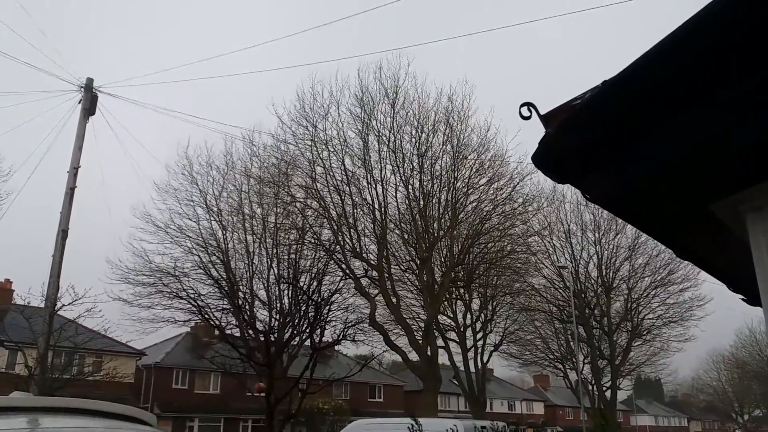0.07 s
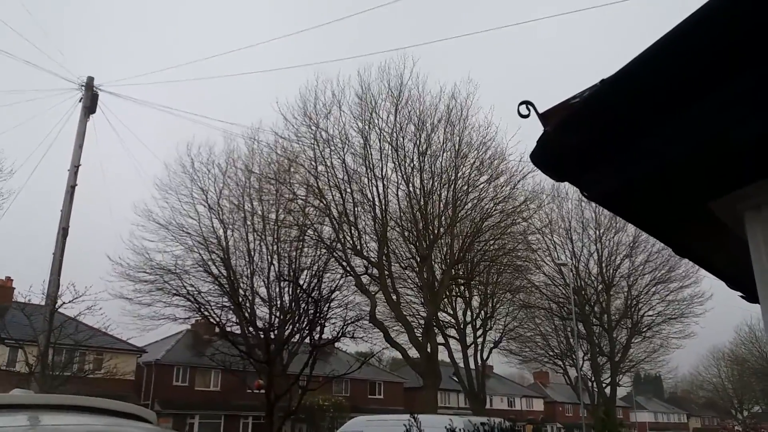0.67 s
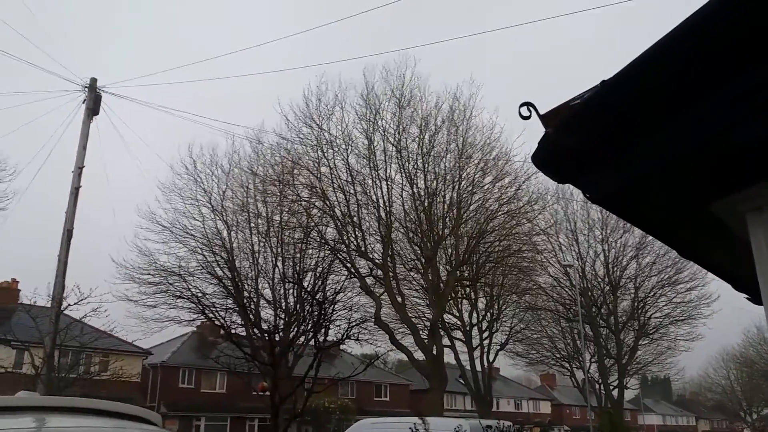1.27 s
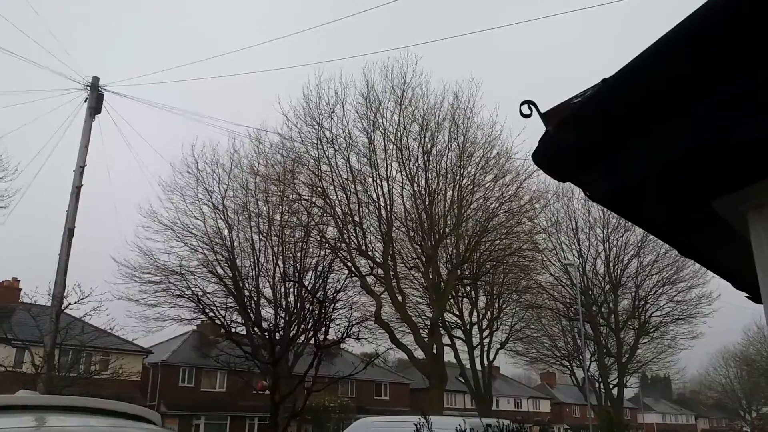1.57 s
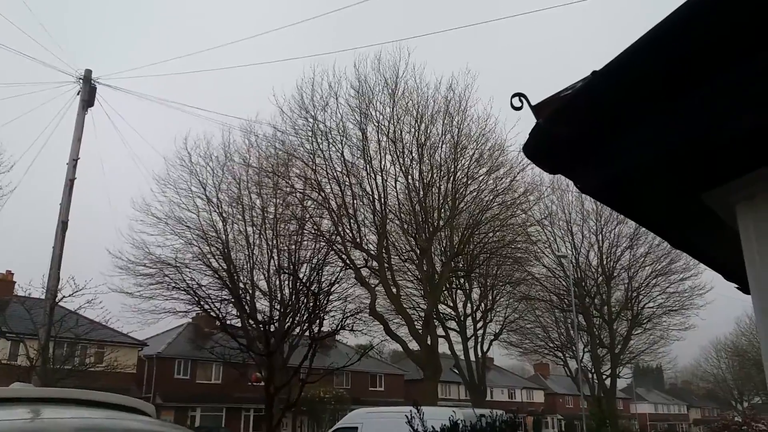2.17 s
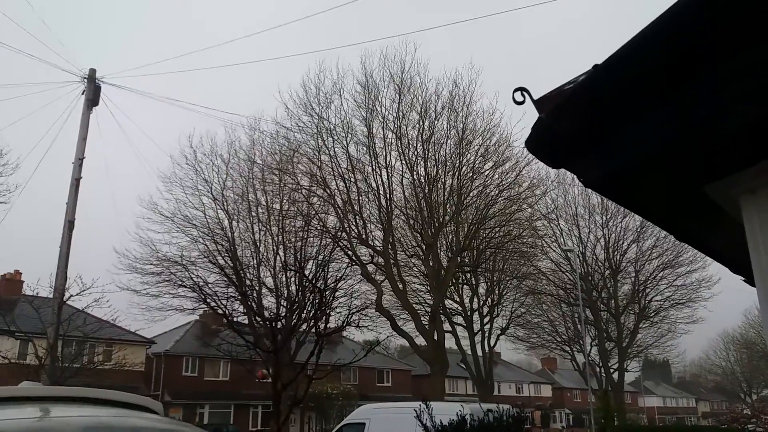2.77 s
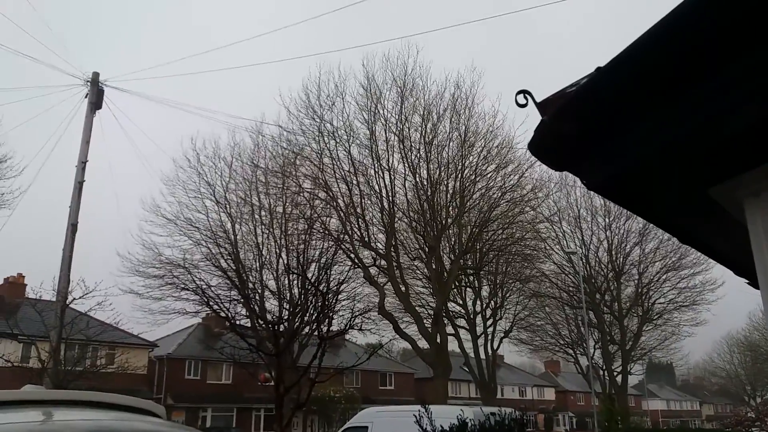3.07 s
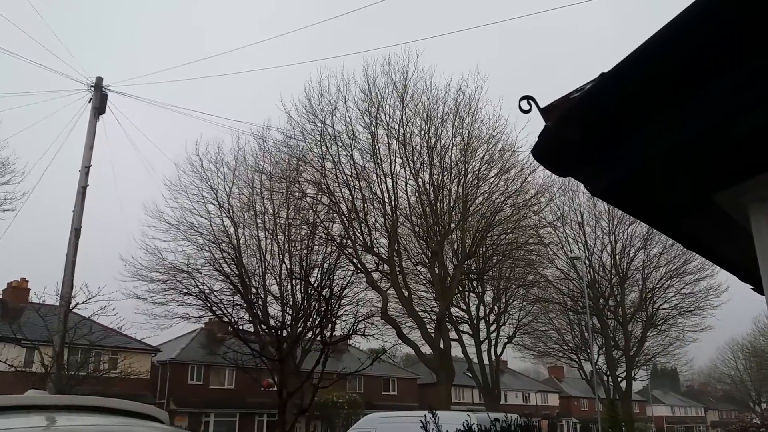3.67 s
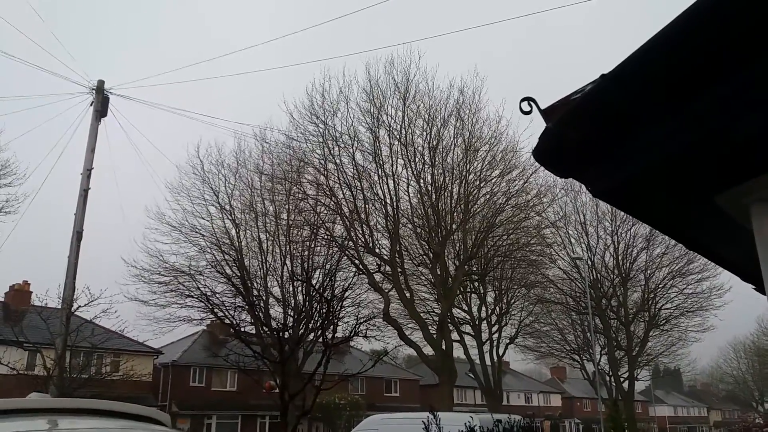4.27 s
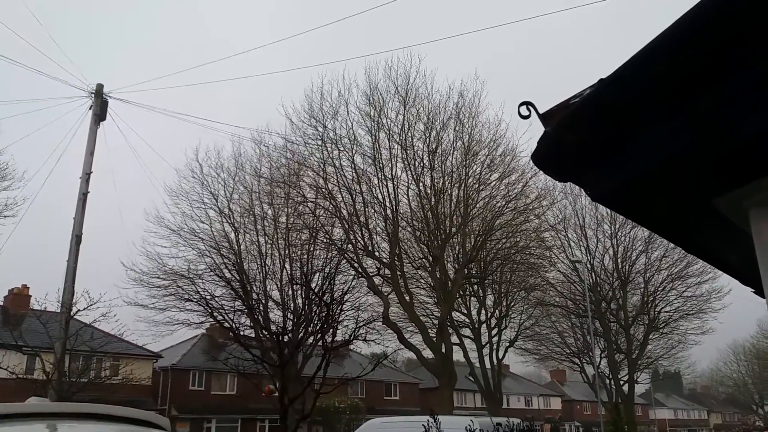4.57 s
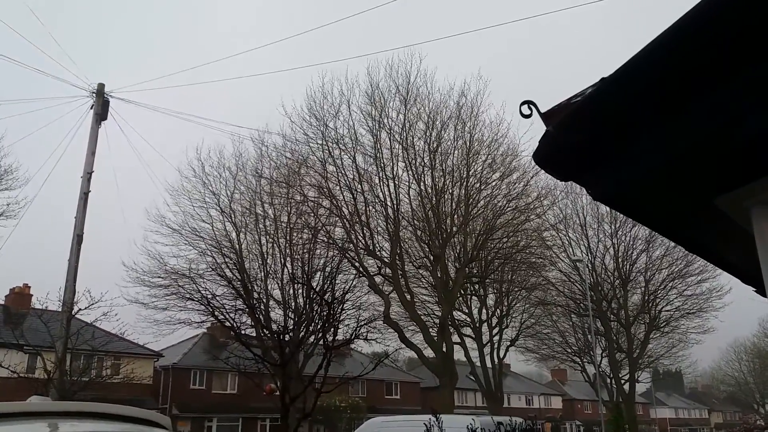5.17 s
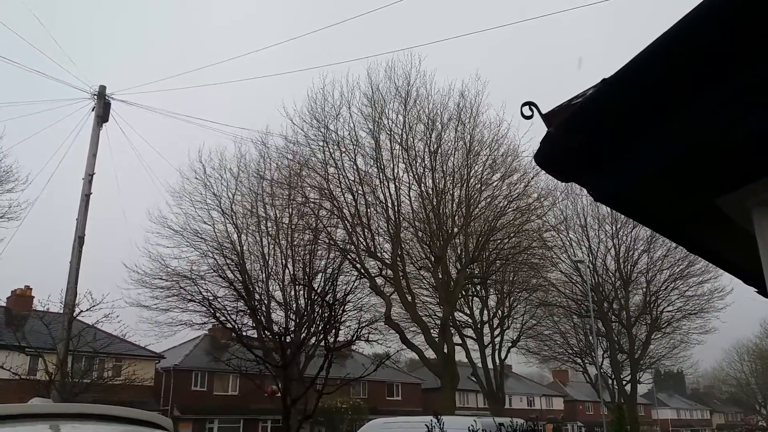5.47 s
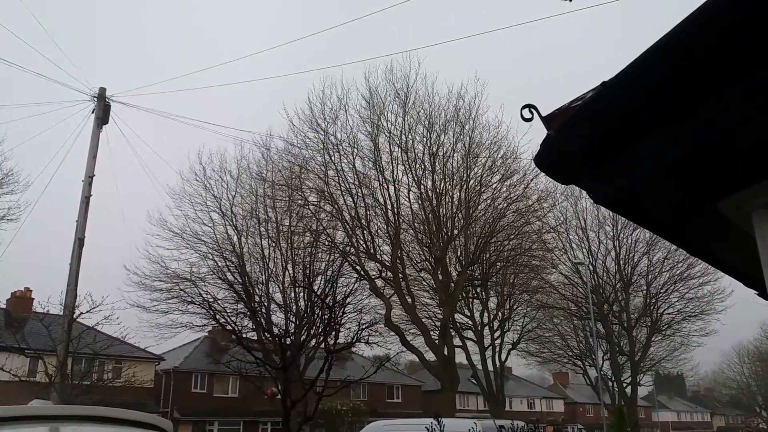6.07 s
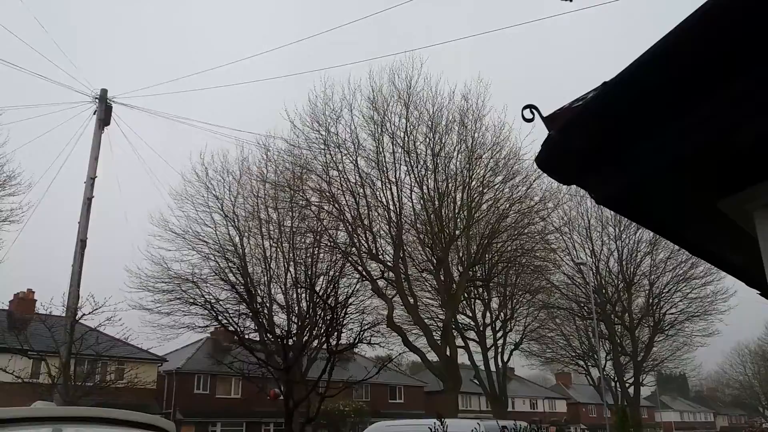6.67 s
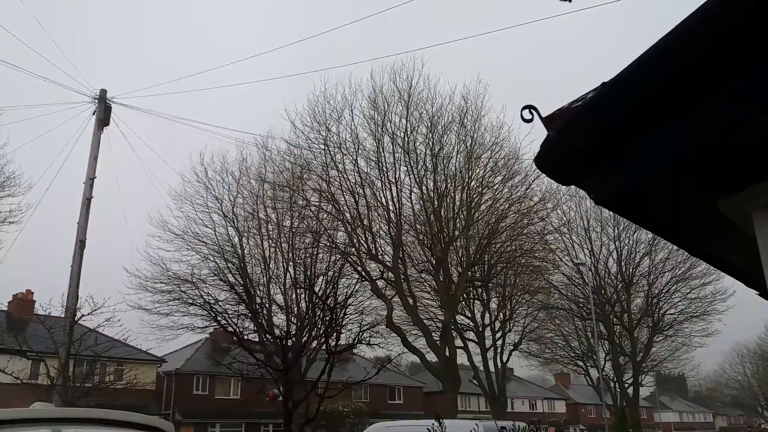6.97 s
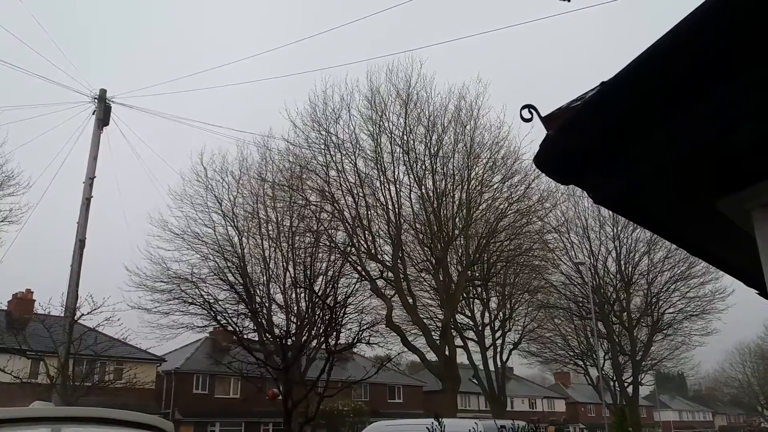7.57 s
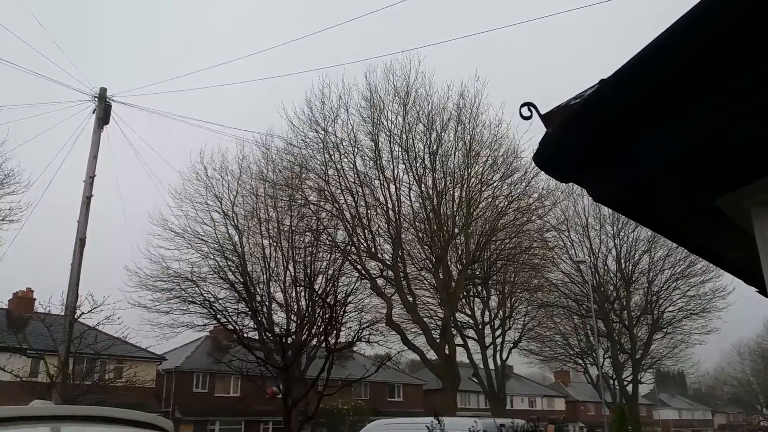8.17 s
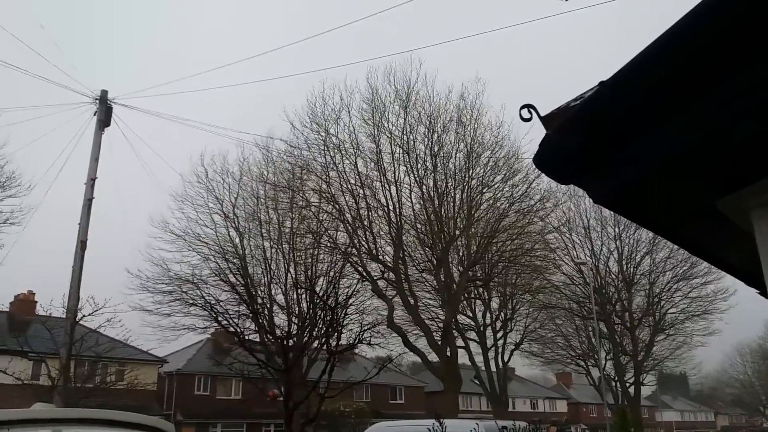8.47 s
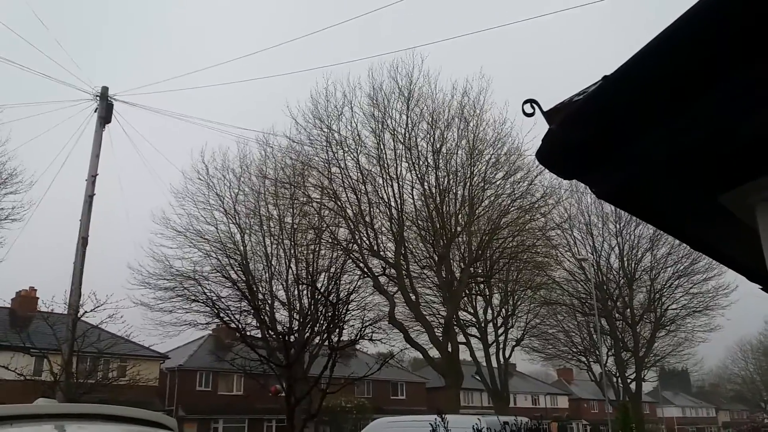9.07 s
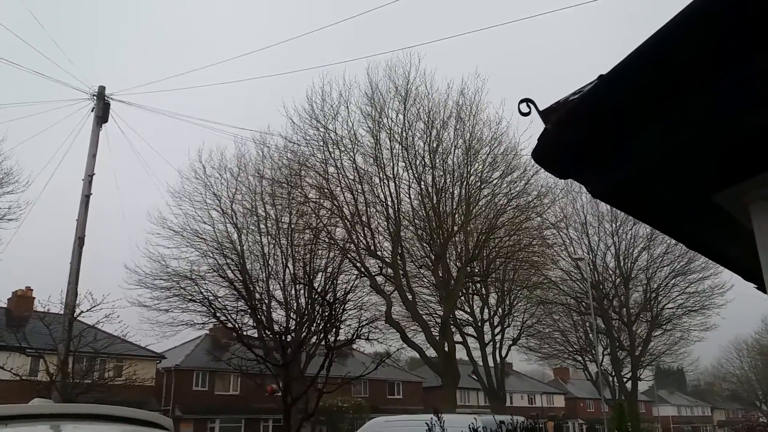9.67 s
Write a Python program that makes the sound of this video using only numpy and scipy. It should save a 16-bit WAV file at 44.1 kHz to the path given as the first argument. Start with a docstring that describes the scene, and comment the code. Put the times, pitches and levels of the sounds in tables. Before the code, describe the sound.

Steady rain falls on a street of houses, heard from under a porch roof. Throughout the ten seconds, drops patter on roofs and cars and hiss finely on wet paving. Single drips tap and splash close by at irregular moments, thickest between 1 and 3 seconds. From the start, gusts hit the microphone with low, ragged thumps, the loudest sounds here, hardest around 0.5 seconds and from 1 to 2.3 seconds. Behind them, wind rushes softly through distant bare trees, peaking near 1.6 seconds. Around 3 seconds the rain eases and the gusts weaken, with one sharp thump at 3.3 seconds and smaller ones near 3.8 and 5 seconds. The last gust passes at about 6 to 6.4 seconds. A faint rumble of breeze stays to the end, while the rain swells briefly near 5.8, 7.8 and 9.7 seconds.

```python
"""Steady rain on a street of houses, heard from under a porch roof.
From the start, drops patter on roofs and cars and hiss on wet paving, and drips splash close by.
For the first few seconds, gusts thump the microphone hard and rush in the bare trees.
Around three seconds in, the rain eases and the gusts weaken; the last one passes at about six.
A soft rumble of breeze stays to the end, while the rain swells briefly a few more times."""
import sys
import numpy as np
from scipy import signal
from scipy.fft import rfft, irfft, next_fast_len
from scipy.io import wavfile
from scipy.ndimage import uniform_filter1d, minimum_filter1d, map_coordinates

SR = 44100
rng = np.random.default_rng(int(sys.argv[2]) if len(sys.argv) > 2 else 0)


def transcribe(u):
    """Save the signal u as a 16-bit wav file named by the first command-line argument.

    u: samples, shape (n,) or (channels, n), limited to [-1, 1]; the rate is SR.
    q: integer samples, one column per channel.
    """
    v = np.clip(np.atleast_2d(u).T, -1, 1)
    q = np.round(v * 32767).astype(np.int16)
    wavfile.write(sys.argv[1], SR, q)


N = 437913

# How hard it rains. Each row: time in seconds, relative patter level in dB, relative hiss level in dB.
RAIN_LEVELS = [(0.0, -34.5, -36), (0.47, -40, -37), (0.85, -36.5, -37), (1.22, -39, -39),
               (1.52, -36.5, -39), (1.66, -34.5, -36.5), (1.93, -37.5, -36), (2.29, -36, -38),
               (2.74, -40, -41), (3.32, -41.5, -43), (5.14, -40.5, -41.5), (5.53, -37, -39.5),
               (5.78, -35, -37.5), (6.41, -40, -41.5), (7.47, -39.5, -41.5), (7.8, -36, -38.5),
               (8.19, -40, -41), (8.68, -37, -40.5), (8.99, -40, -40.5), (9.35, -38, -40.5),
               (9.68, -37.5, -37.5), (9.93, -38.5, -39)]
# The nearest drips. Each row: start in seconds, relative level in dB, wetness from 0 (dry) to 1.
NEAR_DRIPS = [(0.71, -30, .35), (1.163, -27, .75), (1.245, -30.5, .3), (1.275, -29.5, 0.53),
              (1.305, -30.5, 0.44), (1.455, -33, 0.97), (1.497, -34.5, 0.84), (1.754, -31, 0.83),
              (1.781, -31, .5), (1.9, -32, 0.82), (1.964, -31.5, 0.92), (2.086, -30.5, 0.99),
              (2.138, -37, 0.98), (2.18, -28, 0.54), (2.355, -36, .05), (2.386, -35, 0),
              (2.415, -31.5, 0.21), (2.586, -39, 0.99), (2.717, -38, 1), (2.868, -31, 0.78),
              (2.979, -34, 0.61), (3.012, -34, 0.54), (3.628, -40, 0.37), (3.89, -34, 0.44),
              (4.038, -35.5, 0.7), (4.229, -39.5, 0.14), (4.643, -33.5, 0.5), (4.85, -42, .95),
              (5.224, -33.5, 0), (5.293, -33, 0), (5.315, -33, 0.03), (5.421, -31.5, 0.22),
              (5.608, -33, .05), (5.669, -29.5, 0.44), (5.867, -30, 0.46), (5.897, -34, 0.83),
              (6.144, -36, 1), (6.227, -35, 0.38), (6.744, -37, .55), (6.797, -30.5, .35),
              (6.848, -38, 0.02), (7.245, -39, .85), (7.486, -30.5, 0.68), (7.624, -38.5, 0),
              (7.705, -35, .95), (8.481, -34.5, 0.22), (8.507, -37, 0.1), (8.885, -35, 0.48),
              (9.003, -36, 1), (9.071, -41, 0.98), (9.608, -33.5, 0.67)]
# Gusts that reach the porch. Each row: start in seconds, end in seconds, relative level in dB.
PORCH_GUSTS = [(0.078, 0.698, -25), (1.021, 1.6, -20.5), (1.69, 2.12, -20.5), (2.202, 2.641, -27.5),
               (3.071, 3.217, -29), (3.477, 3.871, -32.5), (5.48, 5.811, -32.5), (5.988, 6.428, -32.5)]
# The hardest eddies, small spins of air that each make one thump.
# Each row: peak time in seconds, relative level in dB, fade time in seconds, rough pitch in Hz.
EDDY_THUMPS = [(0.145, -14, 0.041, 189.5), (0.25, -18, .045, 200), (0.414, -12, .02, 225),
               (0.486, -14.5, .011, 170.2), (0.514, -8, .021, 224.7), (0.545, -9.5, .011, 169),
               (0.585, -10.5, .014, 202.7), (0.649, -14, 0.021, 215), (0.698, -17, .014, 162),
               (0.817, -21, 0.027, 152.5), (1.043, -9.5, 0.036, 204.5), (1.13, -6, .018, 295.1),
               (1.194, -12, 0.02, 157.2), (1.22, -6, .025, 273), (1.275, -13, .021, 166.2),
               (1.35, -10, 0.01902, 215.3), (1.383, -6, .026, 241), (1.436, -11, .04, 165.4),
               (1.544, -7, .018, 271.9), (1.578, -6, 0.011, 223.7), (1.596, -4.5, 0.027, 234.6),
               (1.706, -8, .025, 234), (1.796, -12, .05, 166), (1.941, -11, .055, 210.4),
               (2.002, -13.5, 0.031, 171.7), (2.206, -11, 0.024, 171.6), (2.237, -10, .016, 234.2),
               (2.397, -22, .035, 175), (2.625, -21, 0.049, 175.2), (3.092, -22, 0.021, 133),
               (3.17, -18, 0.04006, 146.9), (3.221, -17.5, 0.025, 109.3), (3.315, -9, 0.014, 165),
               (3.472, -22, 0.021, 138.3), (3.528, -24, 0.024, 97.2), (3.829, -15, .016, 155.3),
               (4.698, -30, .026, 124.1), (4.867, -20.5, 0.027, 119.6), (4.916, -23, .033, 115.4),
               (4.992, -16.5, 0.018, 133.3), (5.192, -31, 0.031, 109.8), (5.495, -25.5, 0.034, 105.5),
               (5.999, -22, 0.017, 122.9), (6.212, -26.5, 0.019, 100)]
# The light air that never stops. Each row: time in seconds, relative level in dB.
BREEZE_LEVELS = [(0, -38.5), (3.7, -39), (4.4, -44), (5.05, -37), (5.4, -42.5), (6.75, -46), (7.05, -41.5),
                 (7.7, -48), (8.2, -48), (9.4, -42), (9.93, -46)]
# Wind in the trees across the street. Each row: time in seconds, level in dB.
TREE_LEVELS = [(0, -44.5), (1.6, -36), (2.4, -42.5), (4.9, -45), (5.7, -42), (8.2, -42.5), (9.0, -43),
               (9.35, -40.5), (9.93, -40.5)]

# The tone of each sound, from low to high. Each row: frequency in Hz, relative strength there in dB.
PATTER_TONE = [(250, -23), (450, -6.5), (700, -0.5), (1100, -0.5), (1600, 0), (2100, -1.5), (2600, -7.5),
               (3100, -12), (4500, -15.5), (8000, -69)]  # heavy drops on roofs and cars
HISS_TONE = [(1500, -23.5), (2800, -11.5), (3500, -5), (4200, -1), (4900, 1), (5600, -2.5), (6500, -6),
             (7400, -12.5), (8500, -18.5), (11000, -23.5), (15700, -41)]  # fine drops on wet paving
FIZZ_TONE = [(4000, -26), (7000, -1), (8500, -2), (9800, 1), (10900, -3), (12000, -0.5), (13500, -6),
             (15700, -5.5)]  # the highest part of the rain on the paving
TAP_TONE = [(200, -14), (700, -9.5), (1400, 5.5), (2200, 2), (3200, -9), (6000, -39)]  # a drip hitting the surface
SPLASH_TONE = [(1800, -9), (3200, 3), (4200, 4.5), (5000, 1.5), (6200, 1), (8000, 1), (12000, -28)]  # a drip landing in a film of water
SPRAY_TONE = [(4000, -37), (7000, 0.5), (9500, 8.5), (12000, 3), (15500, -4)]  # the tiny droplets it throws up
SWIRL_TONE = [(25, -4.5), (70, -6.5), (130, 0), (210, -0.5), (290, -5.5), (400, -12), (580, -22.5),
              (900, -46), (2000, -72)]  # air swirling at the microphone
RASP_TONE = [(150, -6), (400, -1.5), (700, -9.5), (1100, -13), (1600, -28), (3000, -47)]  # air tearing at the microphone's opening
BRANCH_TONE = [(90, -18.5), (140, 2.5), (175, 2), (230, -4), (330, 0), (430, -3), (600, -4), (850, -11),
               (1400, -21), (3000, -46)]  # air rushing through branches


def rain():
    """Drops patter on roofs and cars, and hiss and fizz on paving; all waver as wind sweeps them along."""
    patter_db, hiss_db = curves(RAIN_LEVELS)
    sweep = wobble(per_s=11)
    patter = shower(PATTER_TONE, drops_per_s=260, spread_db=3.5, near_share=0.34, splat_s=0.0017)
    hiss = shower(HISS_TONE, drops_per_s=290, spread_db=5, near_share=0.34, splat_s=0.0037)
    flicker = amp(0.55 * wobble(per_s=7))
    fizz = flicker * shower(FIZZ_TONE, drops_per_s=39, spread_db=6, near_share=0.26, splat_s=0.0029)
    # The fizz grows a little faster than the hiss when the rain thickens.
    fizz_db = hiss_db - 12 + 0.3 * (hiss_db - np.mean(hiss_db))
    roofs = amp(patter_db + 1.5 + 0.7 * sweep) * patter
    paving = amp(0.5 * sweep) * (amp(hiss_db + 0.4) * hiss + amp(fizz_db) * fizz)
    return roofs + paving


def shower(tone, drops_per_s, spread_db, near_share, splat_s):
    """Countless far drops blend into a smooth wash, while nearer ones stand out as tiny splats."""
    wash, grit = rng.standard_normal((2, N))
    lands = rng.random(N) < drops_per_s / SR
    sizes = lands * amp(spread_db * np.minimum(rng.standard_normal(N), 2))
    fade = np.exp(-2 / (splat_s * SR))
    splat_power = signal.lfilter([1], [1, -fade], sizes ** 2)  # gives each drop a short tail
    splats = unit(grit * np.sqrt(splat_power))
    return unit(coloured(np.sqrt(1 - near_share) * wash + np.sqrt(near_share) * splats, tone))


def drips():
    """Each drip taps the surface, splashes in the film of water and throws up a fine spray."""
    taps, splashes, sprays = np.zeros((3, N + SR))
    for start_s, db, wet in [*NEAR_DRIPS, *stray_drips(count=28)]:
        start = round(start_s * SR)
        span = slice(start, start + SR // 5)
        # Water softens the tap; a dry spot splashes less and hardly sprays.
        tap_db = db + 8 - 15.5 * wet
        splash_db = db + 12.5 - 9.5 * (1 - wet) ** 2
        spray_db = db + 2 - 37 * (1 - wet)
        # A wetter spot gives a higher splash.
        splash_hz = (4060 + 1300 * wet) * np.exp(0.097 * rng.standard_normal())
        film = signal.iirpeak(splash_hz, Q=4, fs=SR)
        splash = impact(rise_s=0.001, fade_s=0.0035, scatter_s=0.02, scatter_db=-12)
        tap = impact(rise_s=0.0019, fade_s=0.0037, scatter_s=0.014, scatter_db=-4)
        spray = impact(rise_s=0.0037, fade_s=0.0029, scatter_s=0.023, scatter_db=-9.5)
        taps[span] += amp(tap_db) * tap
        splashes[span] += amp(splash_db) * signal.lfilter(*film, splash)
        sprays[span] += amp(spray_db) * spray
    return coloured(taps, TAP_TONE) + coloured(splashes, SPLASH_TONE) + coloured(sprays, SPRAY_TONE)


def impact(rise_s, fade_s, scatter_s, scatter_db):
    """The noise of one hit, followed by the weaker fall of the droplets it throws up."""
    t = np.arange(SR // 5) / SR
    rise = 1 - np.exp(-t / rise_s)
    fall = np.exp(-t / fade_s) + amp(scatter_db) * np.exp(-t / scatter_s)
    return rise * fall * rng.standard_normal(len(t))


def stray_drips(count):
    """Fainter drips at random, in rows like NEAR_DRIPS; harder rain brings more and louder ones."""
    _, hiss_db = curves(RAIN_LEVELS)
    rain_so_far = np.cumsum(amp(hiss_db) ** 2)
    when, faintness, wet = rng.random((count, 3)).T
    starts = np.searchsorted(rain_so_far, when * rain_so_far[-1])
    return np.column_stack([starts / SR, hiss_db[starts] + 1 - 4 * faintness, wet])


def wind_on_microphone():
    """Moving air thumps the microphone; a harder push swings the pressure faster, so it sounds higher."""
    strength, pitch_hz = airflow()
    flutter = wobble(per_s=120)  # small whirls make both speed and strength ragged
    speed = pitch_hz / 200 * amp(1.1 * flutter - 0.75)
    # Running through the low noise faster or slower raises or lowers its pitch.
    swirl = map_coordinates(turbulence(SWIRL_TONE, even_s=0.027), [np.cumsum(speed)], mode="wrap")
    pressure = strength * amp(1.86 * flutter + 0.44) * swirl
    # The hardest pushes tear the flow at the microphone's opening into a brief rasp.
    rasp = amp(-18.5) * pressure ** 2 * noise(RASP_TONE)
    # The microphone passes little below 52 Hz.
    low_cut = signal.butter(6, 52, "highpass", fs=SR, output="sos")
    return signal.sosfilt(low_cut, pressure + rasp)


def airflow():
    """Breeze, gusts and eddies add up to give the strength and rough pitch of the air's rumble."""
    t = np.arange(N) / SR
    breeze_db, = curves(BREEZE_LEVELS)
    whirls = wobble(per_s=40)
    power = amp(breeze_db + 2 * whirls) ** 2
    rise_s, fall_s = 0.01993, 0.0512  # each gust rises, holds, then dies away
    for start, end, db in PORCH_GUSTS:
        fade = np.maximum(start - t, 0) / rise_s + np.maximum(t - end, 0) / fall_s
        power += (amp(db + 2.5 * whirls) * np.exp(-np.minimum(fade, 20))) ** 2
    # The pitch is an average in which the strongest flow counts most.
    rumble_hz = 109.83 + 70 * np.sqrt(power)
    weighted_hz = power * rumble_hz
    for peak_s, db, fade_s, hz in EDDY_THUMPS:
        near = slice(max(0, int((peak_s - 0.2) * SR)), int((peak_s + 0.2) * SR))
        age = (t[near] - peak_s) / fade_s
        # An eddy arrives suddenly, then weakens and slows, so its thump sinks in pitch.
        fade = np.where(age < 0, 4 * age ** 2, 3 * np.abs(age) ** 1.5)
        push = amp(db) ** 2 * np.exp(-fade)
        power[near] += push
        weighted_hz[near] += push * hz * (1 - 0.1805 * np.tanh(age))
    return np.sqrt(power), weighted_hz / power


def turbulence(tone, even_s):
    """Churning air: noise whose strength is evened out over even_s seconds."""
    churn = noise(tone)
    window = signal.windows.hann(int(even_s * SR) + 3)
    local_power = np.abs(signal.fftconvolve(churn ** 2, window / window.sum(), "same"))
    return churn / np.sqrt(local_power + 0.011)


def wind_in_trees():
    """Air passing through bare branches makes a soft, distant rush."""
    level_db, = curves(TREE_LEVELS)
    return amp(level_db + 0.28 * wobble(per_s=5)) * noise(BRANCH_TONE)


def amp(db):
    """Turn decibels into a number to multiply a sound by."""
    return 10 ** (np.asarray(db) / 20)


def unit(x):
    """Scale a sound so that its average power is 1."""
    return x / np.sqrt(np.mean(x ** 2) + 1e-20)


def curves(rows):
    """Join a table's rows with straight lines: one curve for each column after the time."""
    times, *columns = np.transpose(rows)
    return [np.interp(np.arange(N) / SR, times, column) for column in columns]


def wobble(per_s):
    """A smooth curve that passes through per_s random values each second."""
    return map_coordinates(rng.standard_normal(1024), [np.arange(N) * per_s / SR], mode="wrap")


def coloured(x, tone):
    """Filter a sound so that its lows and highs follow a tone table."""
    size = 2 * next_fast_len(N // 2 + 8192)
    hz, db = np.transpose(tone)
    log_hz = np.log(np.fft.rfftfreq(size, 1 / SR) + 1)
    gain = unit(amp(np.interp(log_hz, np.log(hz), db)))
    # These steps make the filter ring only after a hit, never before it.
    cepstrum = irfft(np.log(gain), size)
    cepstrum[1:size // 2] *= 2
    cepstrum[size // 2 + 1:] = 0
    return irfft(rfft(x, size) * np.exp(rfft(cepstrum)), size)[:N]


def noise(tone):
    """Steady noise with the given tone and an average power of 1."""
    return unit(coloured(rng.standard_normal(N), tone))


def scene():
    """Rain, drips and wind all meet at one microphone."""
    return (rain() + drips() + wind_in_trees() + wind_on_microphone())[None]


def record(dry):
    """The recorder turns down briefly around the hardest thumps and cuts off the very highest sounds."""
    ceiling, hold_s, top_hz = 0.5, 0.016, 15750
    width = int(hold_s * SR) + 1
    level = uniform_filter1d(np.abs(dry), size=130)  # an average, so the sharpest tips slip through
    needed_gain = np.minimum(1, ceiling / (level + 1e-9))
    smooth_gain = uniform_filter1d(minimum_filter1d(needed_gain, width), width)
    size = next_fast_len(N + 8192)
    kept = np.fft.rfftfreq(size, 1 / SR) < top_hz
    return irfft(rfft(dry * smooth_gain, size) * kept, size)[..., :N]


dry = scene()
out = record(dry)
transcribe(out)
```